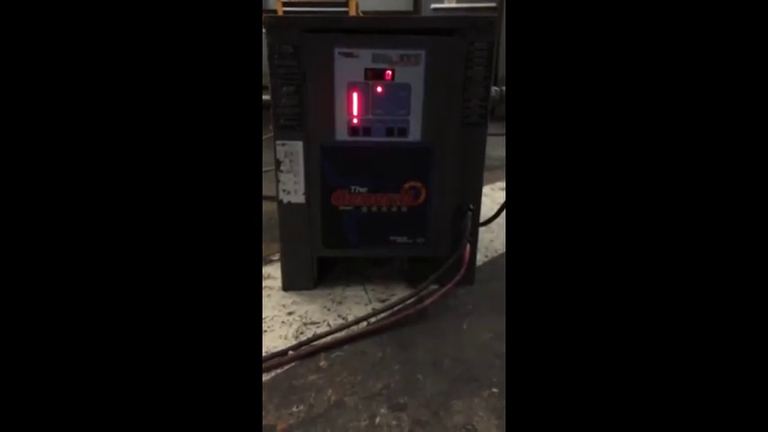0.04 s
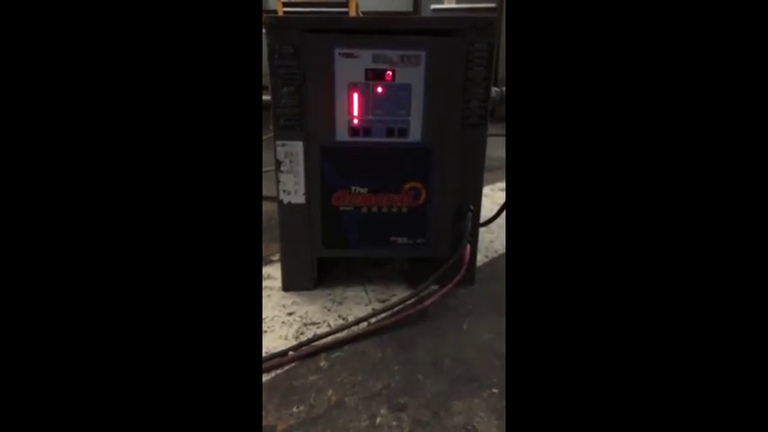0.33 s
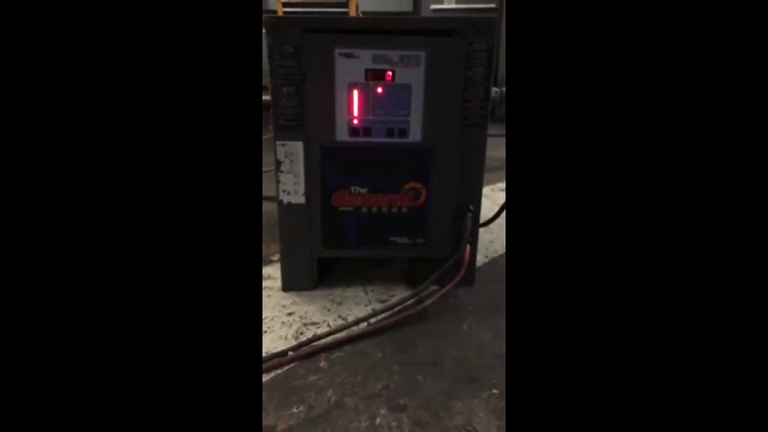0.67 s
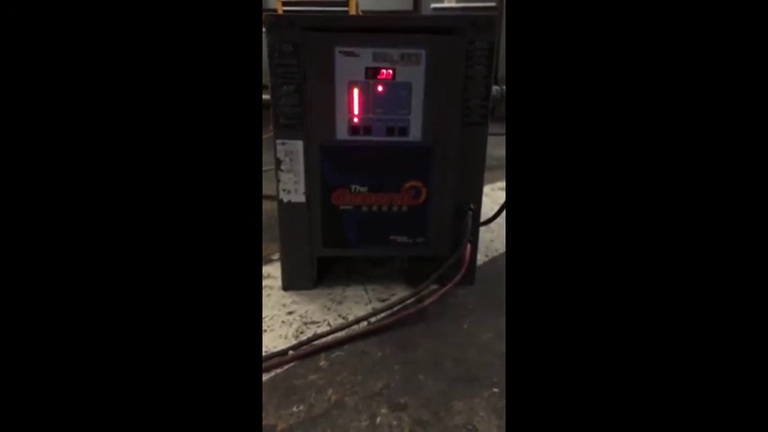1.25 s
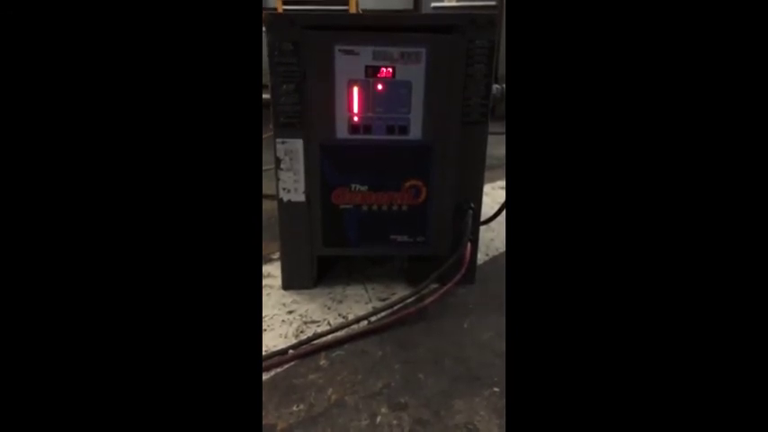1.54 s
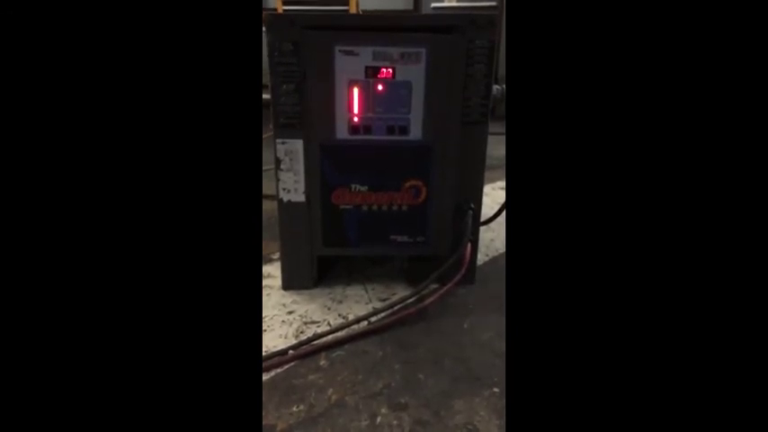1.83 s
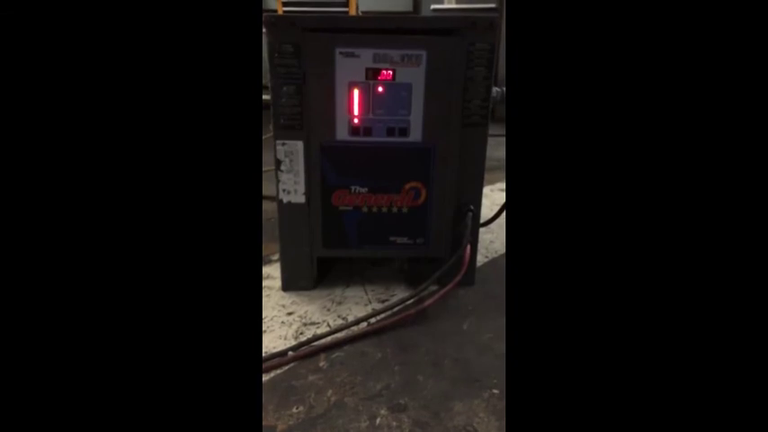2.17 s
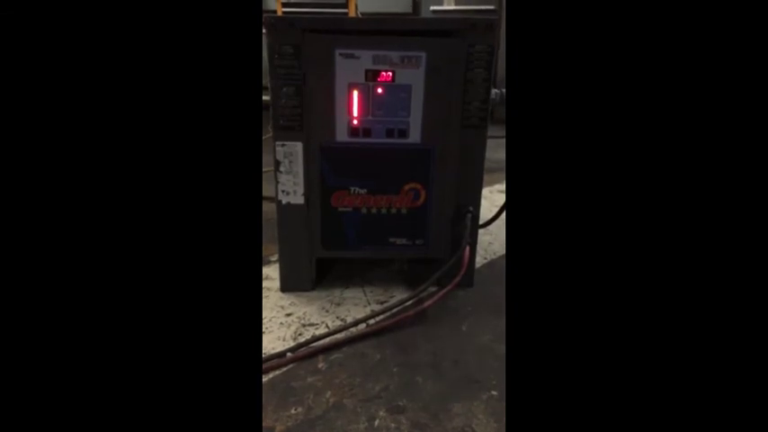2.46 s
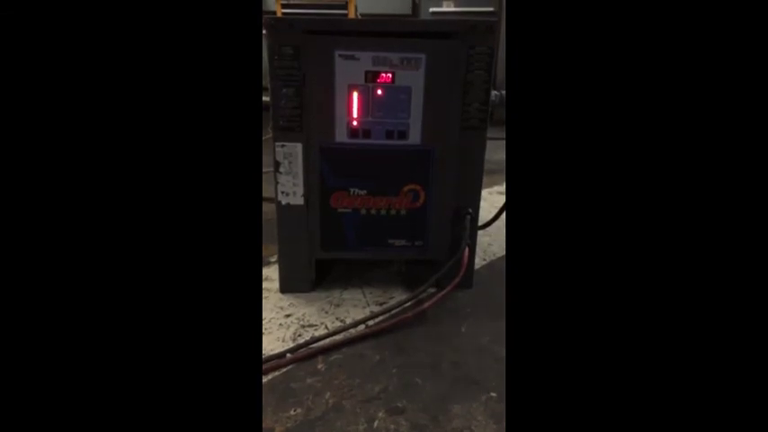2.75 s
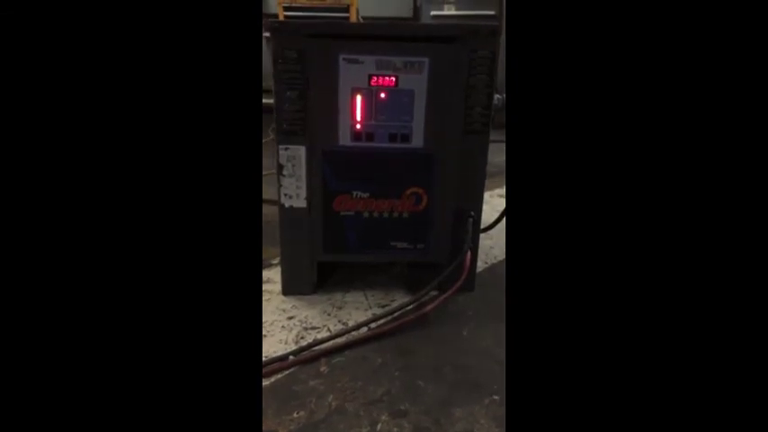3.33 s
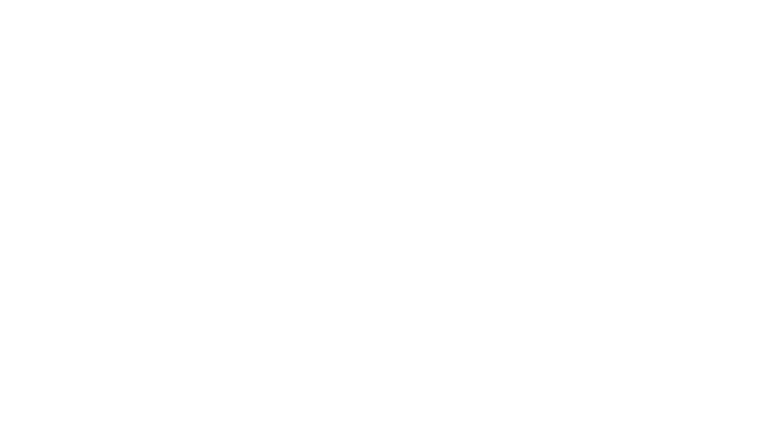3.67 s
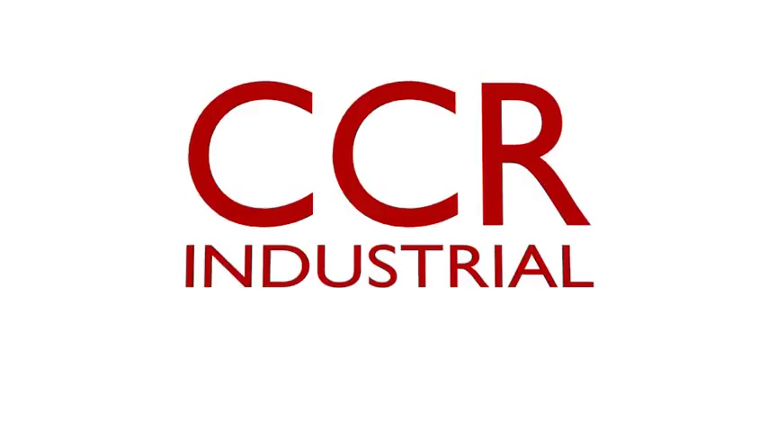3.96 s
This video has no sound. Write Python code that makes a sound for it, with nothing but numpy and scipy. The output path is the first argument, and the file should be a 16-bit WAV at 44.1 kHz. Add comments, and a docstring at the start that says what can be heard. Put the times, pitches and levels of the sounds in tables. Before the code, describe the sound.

An industrial battery charger hums close by, its low electrical drone mixed with a steady rush of fan air and faint wavering tones. The hum swells slightly from about 0.5 to 2.4 seconds, then eases. The hand-held phone adds a faint rumble, a soft bump at the very start and a cluster of dull thuds from 2.7 to 3.4 seconds. Everything stops dead at about 3.6 seconds.

```python
"""A warehouse, a step from an industrial battery charger, heard through a hand-held phone.
The charger's transformer hums on multiples of twice the mains rate. Its fans lay a steady bed of air
under the hum, ring the housing and add a cluster of wavering tones. The hand rumbles on the phone
and bumps it softly at the start and mostly near the end; then the sound stops dead."""
import sys
import numpy as np
from scipy import signal
from scipy.fft import rfft, irfft
from scipy.io import wavfile
from scipy.ndimage import uniform_filter1d, map_coordinates

SR = 44100
rng = np.random.default_rng(int(sys.argv[2]) if len(sys.argv) > 2 else 0)


def output_pcm(signal):
    """Save a mono or channel-first signal as 16-bit PCM at the path in sys.argv[1].

    Samples are clipped to [-1, 1] before scaling.
    """
    pcm = np.clip(np.atleast_2d(signal).T, -1, 1) * 32767
    wavfile.write(sys.argv[1], SR, np.round(pcm).astype(np.int16))


N = 176400
T = np.arange(N) / SR

# Colour of the hand's rumble. Each row: frequency in Hz, relative level in dB.
RUMBLE_SPECTRUM = [(18, -39.5), (28, -24.5), (40, -1), (54, 1), (72, 3), (100, -3.5), (170, -8), (250, -16),
                   (500, -37.5), (1000, -77)]
# Fader ride on the rumble. Each row: time in seconds, level in dB.
RUMBLE_RIDE = [(0, -36.5), (.12, -53), (.24, -51.5), (.33, -50), (.85, -49), (1.05, -44.5), (1.2, -50),
               (1.75, -50.5), (1.97, -49.5), (2.16, -52.5), (2.38, -46), (2.64, -47.5), (2.92, -42.5),
               (3.07, -58), (3.15, -54), (3.27, -42.5), (3.42, -50.5), (3.56, -56.5)]
# Finger bumps. Each row: centre in seconds, pitch in Hz, half length in seconds, envelope peak in dB.
FINGER_BUMPS = [(.010, 63.4, 0.0066, -26.5), (0.032, 61, 0.0072, -25.5), (1.051, 73, 0.065, -40),
                (1.935, 136, 0.0098, -36.5), (2.02, 189, .06, -46), (2.531, 77, 0.036, -38),
                (2.731, 68.5, 0.02, -34.5), (2.863, 100, 0.0057, -26.5), (2.901, 213, 0.0065, -36),
                (2.914, 75, .012, -31.5), (2.948, 175, 0.0084, -29), (2.956, 92, 0.0081, -21),
                (2.971, 132, 0.0072, -26.5), (2.987, 68, 0.024, -32.5), (3.192, 71, 0.0089, -33.5),
                (3.209, 109, 0.0039, -23), (3.217, 122.7, 0.0028, -21), (3.246, 102, 0.0084, -22.5),
                (3.272, 90, 0.021, -30), (3.303, 115, 0.009, -30.5), (3.326, 92.4, 0.0115, -26.5),
                (3.39, 65, 0.048, -42)]
# Colour of the air in the vents. Each row: frequency in Hz, relative level in dB.
AIR_SPECTRUM = [(30, -29.5), (120, 5.5), (200, -3.5), (290, -0.5), (540, -4.5), (630, -2), (800, 0),
                (1030, -0.5), (1240, -1.5), (1400, -4), (2000, -2), (2500, -4), (3000, -6.5), (3600, -9),
                (4450, -10), (4900, -14), (5450, -13), (6500, -17.5), (7600, -22.5), (9000, -23.5),
                (9800, -28), (10400, -33), (11400, -31), (15500, -38)]
# Early echoes off nearby hard surfaces. Each row: delay in milliseconds, level in dB against the direct air.
EARLY_ECHOES = [(1.8, -17), (3.2, -14.5), (8.3, -17.5)]
# Resonances of the housing. Each row: centre in Hz, half width in Hz, level in dB.
HOUSING_MODES = [(422.3, 3.7, -64), (462.5, 3.6, -66), (497.3, 4.1, -60.5), (539.5, 3.5, -69),
                 (613.7, 5.3, -65), (693, 16, -66.5), (802, 7.8, -65.5), (858, 14, -69.5), (963, 17, -68),
                 (987, 8.3, -71), (1084, 10, -71), (2140, 25, -71), (2400, 28, -72), (2900, 30, -76),
                 (3420, 70, -74), (4580, 130, -72.5), (5410, 150, -70.5)]
# Tones of the fans and their motors. Each row: pitch in Hz, level in dB before the trim.
FAN_PARTIALS = [(158.5, -68), (192.5, -64), (201.5, -62.5), (220.7, -59.5), (266.3, -65), (278.5, -74.5),
                (340.5, -68.5), (348, -66.5), (379, -60), (398.5, -65), (420.5, -67), (651.5, -74.5),
                (739, -74), (924, -68), (1044, -71), (1164, -75.5), (1232, -75), (1619, -74)]
# Fader ride on the hum's lowest tone. Each row: time in seconds, level in dB.
FUNDAMENTAL_RIDE = [(0, -55), (.3, -50.5), (.6, -48), (1.4, -48), (1.8, -47), (2.35, -47), (2.7, -52),
                    (3.1, -53.5), (3.6, -53.5)]
# Overtones of the transformer. Each row: multiple of the hum's pitch, level in dB.
HUM_OVERTONES = [(2, -61), (3, -53), (4, -59), (5, -63.5), (6, -66.5), (7, -69.5), (8, -66), (9, -69.5),
                 (10, -77), (11, -77), (13, -68.5), (14, -79.5), (16, -70), (21, -74), (26, -72)]


def undb(db):
    """Decibels to gain."""
    return 10 ** (np.asarray(db) / 20)


def wander(per_s):
    """A smooth random modulator of spread 1 that heads for a new value per_s times a second."""
    hold = max(int(SR / per_s), 2)
    steps = rng.standard_normal(512)[(np.arange(N) // hold) % 512]
    smooth = uniform_filter1d(uniform_filter1d(steps, hold), hold)
    return smooth / smooth.std()


def shaped_noise(gain_at):
    """Noise of rms 1 whose spectrum follows a function of frequency."""
    hz = np.maximum(np.fft.rfftfreq(N, 1 / SR), 1)
    shaped = irfft(rfft(rng.standard_normal(N)) * gain_at(hz), N)
    return shaped / shaped.std()


def coloured_noise(spectrum):
    """Noise of rms 1 with an EQ curve drawn through (Hz, dB) points."""
    hz, db = np.transpose(spectrum)
    return shaped_noise(lambda f: undb(np.interp(np.log(f), np.log(hz), db)))


def tone(hz):
    """A sine of rms 1 on a steady pitch or a pitch curve."""
    cycles = np.cumsum(np.broadcast_to(hz, N)) / SR
    return np.sqrt(2) * np.sin(2 * np.pi * (cycles + rng.random()))


def grip_rumble():
    """The hand's grip on the phone makes a low rumble that swells and dips."""
    return coloured_noise(RUMBLE_SPECTRUM) * undb(np.interp(T, *np.transpose(RUMBLE_RIDE)))


def finger_bumps(contact_ratio=2.52, contact_db=-16.5, contact_half_s=0.0047):
    """Each finger bump is a soft thud that swells and dies, with a brief overtone at the contact."""
    bumps = np.zeros(N)
    for centre_s, hz, half_s, db in FINGER_BUMPS:
        age = T - centre_s
        thud = np.exp(-(age / half_s) ** 2) * np.sin(2 * np.pi * hz * age)
        contact = np.exp(-(age / contact_half_s) ** 2) * np.cos(2 * np.pi * contact_ratio * hz * age)
        bumps += undb(db) * (thud + undb(contact_db) * contact)
    return bumps


def vent_air(level_db=-48.5, flicker_db=0.48, sway_ms=0.2037):
    """Air rushes evenly through the vents; its early echoes shift as the hand sways."""
    direct = coloured_noise(AIR_SPECTRUM) * undb(level_db + flicker_db * wander(per_s=20))
    rush = direct.copy()
    for delay_ms, db in EARLY_ECHOES:
        lag_s = (delay_ms + sway_ms * wander(per_s=0.8)) / 1000
        rush += undb(db) * map_coordinates(direct, [(T - lag_s) * SR], mode="mirror")
    return rush


def housing_ring(swell_db=1.3):
    """The airflow rings the housing: narrow bands of noise in passing swells."""
    ring = np.zeros(N)
    for hz, half_width_hz, db in HOUSING_MODES:
        gain = undb(db + swell_db * wander(per_s=5))
        ring += gain * shaped_noise(lambda f: 1 / (1 + ((f - hz) / half_width_hz) ** 2))
    return ring


def fan_tones(trim_db=0.5, waver_db=2, drift_hz=0.806):
    """Fans and motors sing a cluster of tones, each drifting a little in pitch and level."""
    cluster = np.zeros(N)
    for hz, db in FAN_PARTIALS:
        gain = undb(db + trim_db + waver_db * wander(per_s=3))
        cluster += gain * tone(hz + drift_hz * wander(per_s=3))
    return cluster


def transformer_hum(hum_hz=119.95, waver_db=1.05, waver_per_s=8.36):
    """The core hums on exact harmonics that waver in level; the lowest swells and later sinks."""
    fundamental_db = np.interp(T, *np.transpose(FUNDAMENTAL_RIDE))
    hum = np.zeros(N)
    for multiple, db in [(1, fundamental_db), *HUM_OVERTONES]:
        hum += undb(db + waver_db * wander(waver_per_s)) * tone(multiple * hum_hz)
    return hum


def scene():
    """The charger and the handling noise, mixed in mono."""
    charger = transformer_hum() + fan_tones() + vent_air() + housing_ring()
    return (charger + grip_rumble() + finger_bumps())[None]


def record(dry, low_cut_hz=28, stop_s=3.616, high_cut_hz=15700):
    """The phone rolls off the deepest bass, stops dead and cuts the top."""
    low_cut = signal.butter(2, low_cut_hz, "high", fs=SR, output="sos")
    high_cut = signal.ellip(10, .1, 70, high_cut_hz, fs=SR, output="sos")
    stopped = signal.sosfilt(low_cut, dry) * (T < stop_s)
    return signal.sosfilt(high_cut, stopped)


dry = scene()
out = record(dry)
output_pcm(out)
```